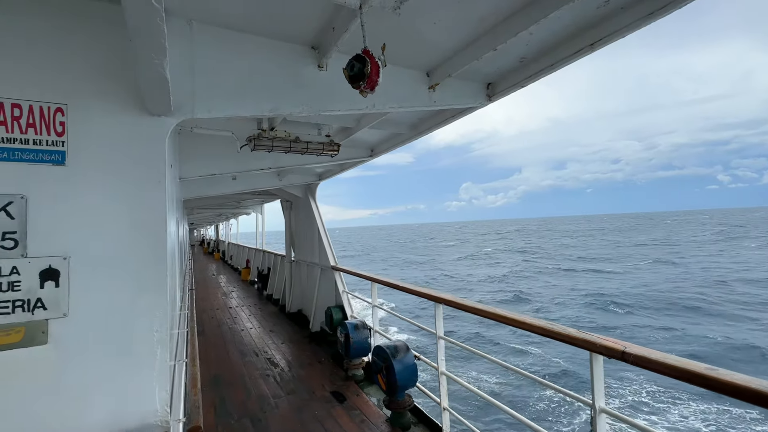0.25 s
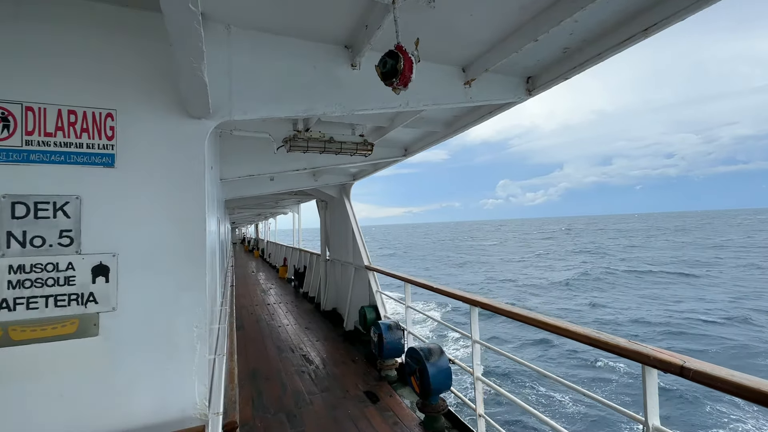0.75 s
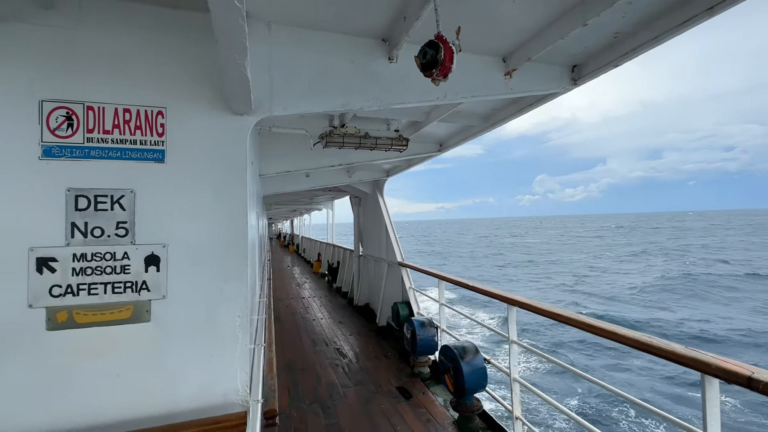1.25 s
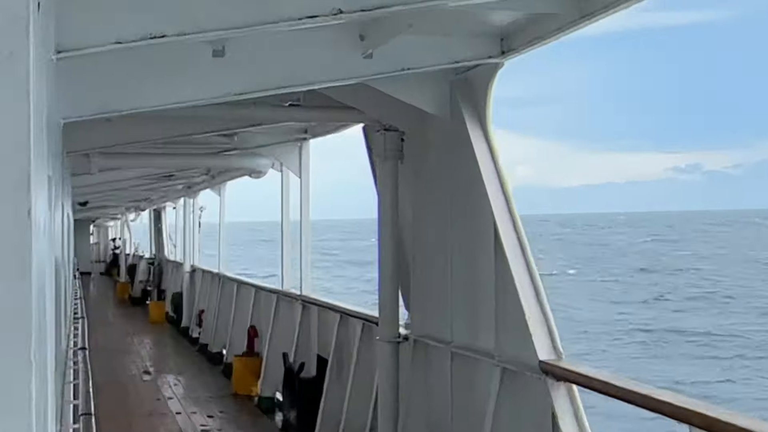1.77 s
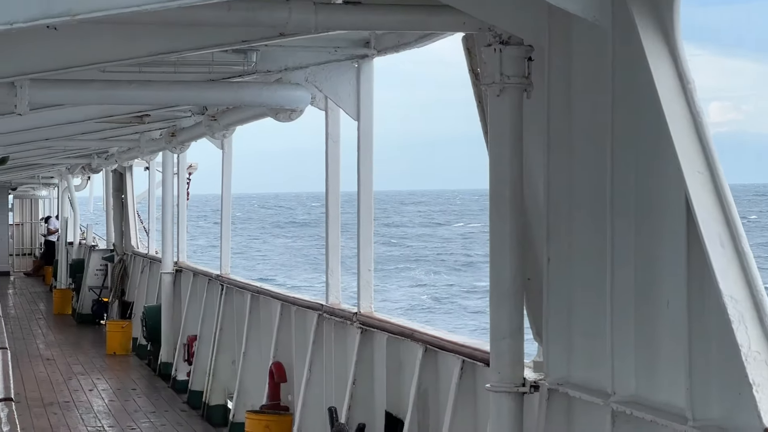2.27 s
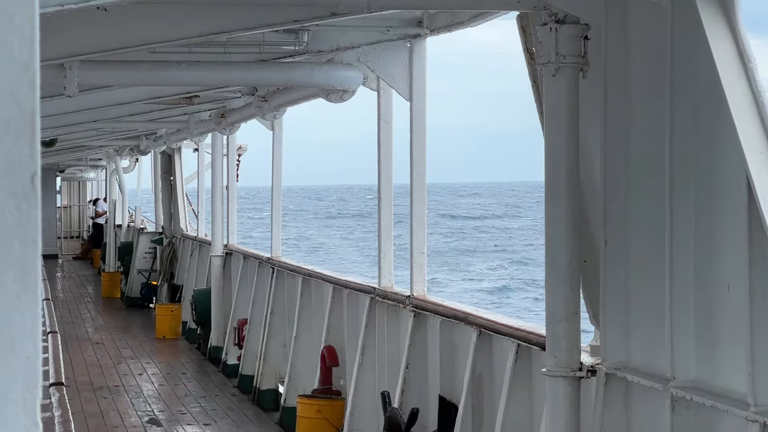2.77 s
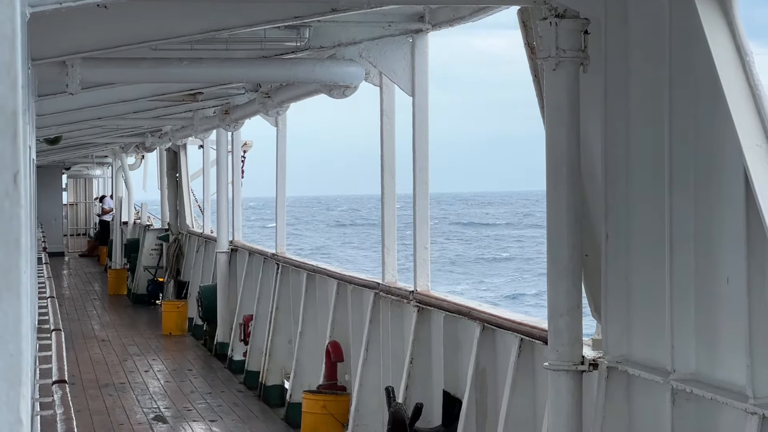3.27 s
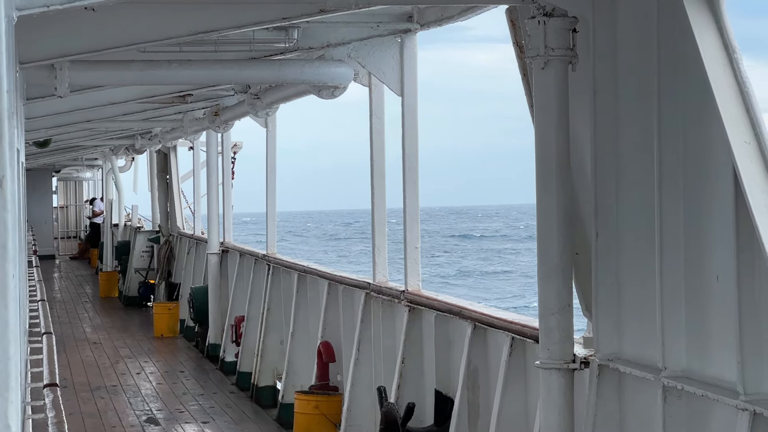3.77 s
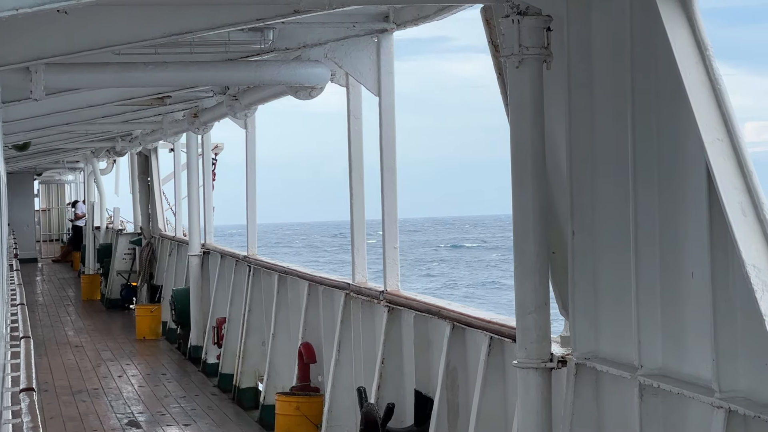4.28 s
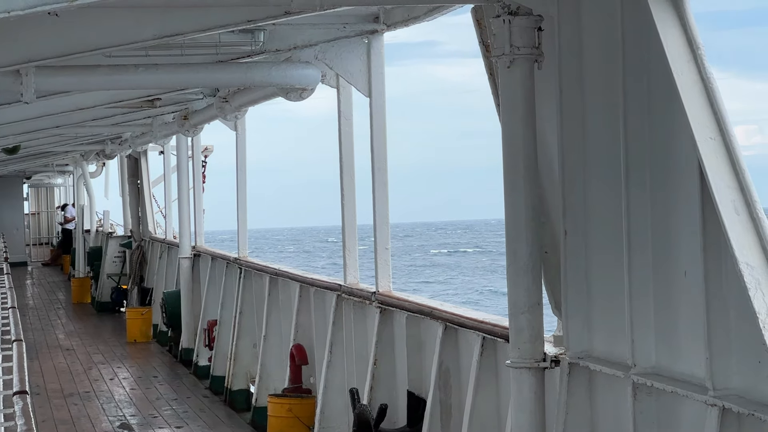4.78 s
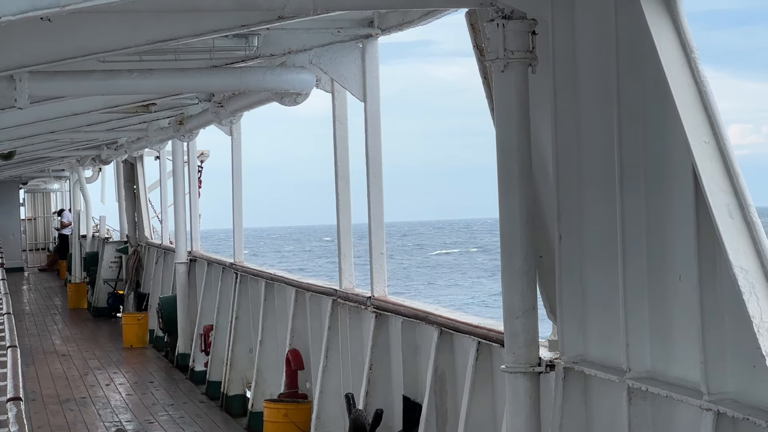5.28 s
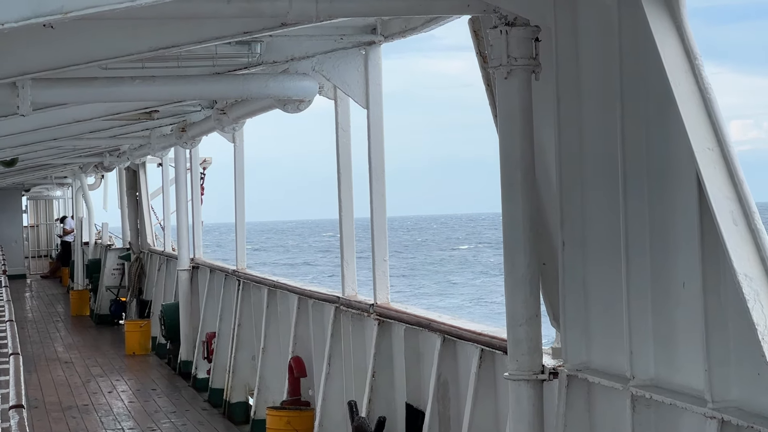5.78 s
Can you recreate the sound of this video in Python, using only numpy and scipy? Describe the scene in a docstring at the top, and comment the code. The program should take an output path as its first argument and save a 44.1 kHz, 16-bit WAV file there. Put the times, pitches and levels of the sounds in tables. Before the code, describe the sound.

Low pulsing engine drone and gusty rumble on an open ship deck, waves hissing along the side, one tiny dry tick past the middle.

```python
"""The open side deck of a ship under way, heard by a handheld phone close to the sea along the side.
From the start the firing tone of the engine, shaft orders and a slower machine come through the hull as tones,
with filtered noise for the unsteady drones, the wind-and-hull rumble, the wash and the spray. At 0.85 s a hollow
ring rises in the wash and sags in pitch. At 1.72 s the lens zooms in: the phone narrows its stereo beam, the wash
changes colour and the hum rises. Gusts lift the rumble most near 3.3 and 5.1 s; a dry tick falls at 3.73 s."""
import sys
import numpy as np
from scipy import signal
from scipy.fft import rfft, irfft, next_fast_len
from scipy.io import wavfile
from scipy.ndimage import uniform_filter1d

SR = 44100
rng = np.random.default_rng(int(sys.argv[2]) if len(sys.argv) > 2 else 0)


def store_wav(level_fs):
    """Save 16-bit WAV to argv[1]."""
    pcm = np.round(np.clip(np.atleast_2d(level_fs), -1, 1) * 32767)
    wavfile.write(sys.argv[1], SR, pcm.T.astype(np.int16))


N = 266187
SIZE = next_fast_len(N)
HZ = np.maximum(np.arange(SIZE // 2 + 1) * SR / SIZE, 1)
TIME = np.arange(N) / SR

# The phone: zoom and top of its range
ZOOM_S, ZOOM_SWITCH_S = 1.724, 0.0053
TOP_HZ = 15750

# A short dry tick: (time [s], level [dB])
TICKS = [(3.73084, -3)]

# Waves breaking along the side: (time [s], lift of the wash [dB])
WAVES = [(.1, 0), (.55, -0.5), (1.0, 1), (1.5, 0.5), (2.75, 1.3), (3.3, 1), (3.7, 2.5), (4.35, 2.5),
         (5.3, 2.5), (5.65, 1)]
WAVE_RISE_S, WAVE_FALL_S = 0.27, 0.55
SPRAY_SHARE, SPRAY_LATE_S = 0.81, 0.083  # the spray follows each wave a little later and less
CREST_HZ, CREST_SHARE = 1400, 1.04  # above this pitch the wash follows each wave more strongly
SURGE_PER_S = 4.54  # each half octave of the wash surges on its own

# Sea colour through the wide and the narrow beam: (frequency [Hz], relative density [dB per Hz])
WIDE_COLOUR = [(300, -51), (450, -52.5), (620, -55.5), (840, -52.5), (1000, -54.5), (1350, -55),
               (1700, -59), (2200, -63.5), (3000, -68.5), (4200, -71), (6300, -70.5), (8000, -71),
               (9500, -74), (10500, -78), (11500, -83), (12200, -92), (13000, -85.5), (15000, -90)]
NARROW_COLOUR = [(300, -55), (450, -58), (620, -60.5), (850, -60.5), (1200, -61.5), (1650, -60.5),
                 (1900, -62.5), (2050, -66), (2300, -71), (3200, -74), (5200, -73.5), (6400, -68.5),
                 (8800, -72), (10500, -74), (11400, -76), (12250, -83), (13000, -81.5), (15400, -84)]
# Stereo image of the sea through each beam:
# (frequency [Hz], likeness of the channels [0-1], lag of the right [rad], left minus right [dB])
WIDE_IMAGE = [(250, .8, 0, .5), (400, .6, .3, 1.5), (600, .4, 1.3, 2), (850, .2, .7, 3.4),
              (1200, .42, 1.2, 3), (1700, .2, 2.7, 1), (2400, .08, 2.5, .5), (4200, .1, 1, 2.5),
              (6300, .1, 0, 6.8), (8000, .1, 0, 3.5), (9400, .15, -1.2, -4), (10200, .4, -2.6, -1),
              (10450, 1, -3.14, 0), (12350, 1, -3.14, 0), (12700, .3, -5.3, 0), (13300, .6, -5.9, 0),
              (13700, 1, -6.28, 0)]
NARROW_IMAGE = [(250, .85, 0, 0), (600, .68, .3, 1.2), (850, .6, .6, 2), (1200, .4, 1.4, -1.5),
                (1600, .45, 3.1, -8), (2000, .55, 6.1, -3.5), (2500, .8, 6.6, -.5), (3200, .82, 6.85, 0),
                (4300, .95, 6.45, 0), (5300, .99, 6.3, 0), (6100, .9, 6.55, 0), (6900, .88, 7.2, 0),
                (7450, .99, 9.42, 0), (8300, .92, 12.4, 0), (9700, .78, 11.1, 0), (10700, 1, 9.42, 0),
                (12300, 1, 9.42, 0), (12500, .55, 7.6, 0), (13600, .7, 6.7, 0), (13800, 1, 6.28, 0)]

# A hollow ring in the wash, heard through the wide beam only
HOLLOW_HZ, HOLLOW_WIDTH_HZ, HOLLOW_DB = 858, 40, -36.5
HOLLOW_FROM_S, HOLLOW_RISE_S, HOLLOW_SAG_HZ_PER_S = 0.85, 0.06, 110

# Colour of the wind-and-hull rumble: (frequency [Hz], relative density [dB per Hz])
RUMBLE_COLOUR = [(15, -72), (24, -58), (31, -55), (36, -46), (45, -40), (56, -40), (64, -36), (85, -37.5),
                 (108, -42), (120, -43), (155, -45.5), (175, -49.5), (260, -54.5), (420, -65.5)]
# Rumble between 60 and 200 Hz, before the gusts: (time [s], level [dB])
RUMBLE_LEVEL = [(0, -20.5), (1.5, -19), (1.85, -25), (2.7, -21.5), (3.35, -18.5), (4.05, -20), (4.8, -18),
                (5.5, -21.5), (6.04, -21.5)]
RUMBLE_SIDE_DB = -14.5
# Strongest gust blows: (time [s], lift of the rumble [dB])
BUFFETS = [(2.45, 1), (3.0, 1.5), (3.3, 5), (3.51, 4.5), (3.8, 2.5), (4.45, -1), (4.05, 1), (4.77, 1.5),
           (5.08, 6), (5.28, 3.5), (5.87, 1)]
BUFFET_S = 0.059  # half length of a blow

# Blurred tones through the hull: (frequency [Hz], half width [Hz], level [dB])
DRONES = [(79.6, 0.8, -29), (224, 7, -42), (249, 3, -40), (332, 7, -39), (441, 7, -46), (538, 9, -47),
          (662, 8, -48), (830, 60, -48)]

# Machinery tones before the beam lift: (multiple of the turning rate [1], level [dB])
SHAFT_HZ, SLOW_HZ = 8.421, 3.441
SHAFT_ORDERS = [(7, -30), (8, -30), (10, -35), (12, -33), (13, -29), (15, -40), (17, -35), (18, -35),
                (19, -35), (21, -44), (23, -45)]
SLOW_ORDERS = [(6, -40), (10, -41), (11, -35), (12, -27), (13, -25), (16, -36), (19, -32), (23, -31),
               (24, -34), (25, -35), (28, -35), (38, -36)]
HUM_LIFT_DB = (-2.5, 1.5)  # through the wide and the narrow beam

# Firing tone of the main engine: (time [s], level [dB])
FIRING_LEVEL = [(0, -18.5), (.3, -18.5), (.6, -17), (.95, -21), (1.3, -16), (1.6, -19.5), (2.1, -13.5),
                (2.35, -19.5), (2.75, -14.5), (2.95, -11), (3.22, -19.5), (3.45, -18), (3.75, -10.5),
                (4.05, -19.5), (4.6, -13.5), (4.92, -21.5), (5.2, -15.5), (5.8, -12.5), (6.04, -15)]
CYLINDER_ORDER = 6  # firings per turn of the shaft
HULL_LAG_S = 0.00005  # the right port hears the hull a little late


def undb(db):
    """Decibels to gain."""
    return 10 ** (np.asarray(db) / 20)


def over_hz(table):
    """Columns of a table over frequency, joined on a log axis."""
    hz, *columns = np.transpose(table)
    return [np.interp(np.log(HZ), np.log(hz), column) for column in columns]


def over_time(table):
    """Columns of a table over time, joined by straight lines."""
    seconds, *columns = np.transpose(table)
    return [np.interp(TIME, seconds, column) for column in columns]


def to_sound(spectrum):
    """Spectrum back to sound, cut to length."""
    return irfft(spectrum, SIZE)[..., :N]


def band_rms(sound, edges):
    """RMS level of a signal between two frequencies."""
    in_band = (HZ > edges[0]) & (HZ < edges[1])
    power = np.abs(rfft(sound, SIZE)[in_band]) ** 2
    return np.sqrt(2 * power.sum() / SIZE / N)


def walk(rate):
    """Random levels held 1 / rate s and slewed twice; spread near 1."""
    hold = int(SR / rate)
    steps = np.repeat(rng.standard_normal(N // hold + 1), hold)
    slewed = uniform_filter1d(uniform_filter1d(steps, hold), hold)
    return 0.87 * slewed[:N]


def swells(table, rise_s, fall_s, late_s=0.):
    """Sum of bell-shaped lifts in dB, one for each row."""
    total_db = 0
    for peak_s, lift_db in table:
        since = TIME - peak_s - late_s
        length_s = np.where(since < 0, rise_s, fall_s)
        total_db = total_db + lift_db * np.exp(-(since / length_s) ** 2)
    return total_db


def churn(lo_hz, count, flicker_db, rate, surge_db=0.):
    """Spectrum of white noise whose half octaves each flicker and surge on their own."""
    white = rfft(rng.standard_normal(SIZE))
    place = np.clip(2 * np.log2(HZ / lo_hz), 0, count - 1)
    total = 0
    for k in range(count):
        half_octave = to_sound(white * np.clip(1 - np.abs(place - k), 0, 1))
        level_db = flicker_db * walk(rate) + surge_db * walk(SURGE_PER_S)
        total = total + half_octave * undb(level_db)
    return rfft(total, SIZE)


def narrow():
    """0 for the wide beam, 1 for the narrow one; the switch takes a few milliseconds."""
    return np.clip((TIME - ZOOM_S) / ZOOM_SWITCH_S + 0.5, 0, 1)


def tick():
    """A 7 kHz swing under a bell of a fraction of a millisecond, alike in both channels."""
    out = np.zeros(N)
    for peak_s, db in TICKS:
        since = TIME - peak_s
        bell = np.exp(-(since / 0.00005) ** 2)
        out -= undb(db) * bell * np.cos(2 * np.pi * 7000 * since + 0.15)
    return out


def hollow(multiple=1, lift_db=0):
    """A narrow band of noise that rises in the wash and sags in pitch, stronger on the left."""
    since = TIME - HOLLOW_FROM_S
    turn = 2 * np.pi * multiple * (HOLLOW_HZ - HOLLOW_SAG_HZ_PER_S * since / 2) * since
    lowpass = 1 / (1 + (HZ / HOLLOW_WIDTH_HZ / multiple) ** 2)
    slow = to_sound(rfft(rng.standard_normal((2, 2, SIZE))) * lowpass)
    ring = slow[0] * np.cos(turn) + slow[1] * np.sin(turn)
    rise = 1 / (1 + np.exp(-since / HOLLOW_RISE_S))
    return undb(HOLLOW_DB + lift_db) * rise * ring / ring.std() * undb([[2.5], [-2.5]])


def sea(calm_wash_db, calm_spray_db, surge_db, colour, image):
    """Noise of wash and spray through one beam: the right port hears a late share of the left."""
    likeness, lag, pan_db = over_hz(image)
    shared, own = (churn(300, count=11, flicker_db=1.1, rate=12, surge_db=surge_db) for _ in range(2))
    right = likeness * np.exp(-1j * lag) * shared + np.sqrt(1 - likeness ** 2) * own
    both = np.array([undb(pan_db / 2) * shared, undb(-pan_db / 2) * right])
    both = both * undb(over_hz(colour)[0]) / (1 + (220 / HZ) ** 4)  # the bass is left to the rumble

    # Split by pitch: body lowest, crest between, spray on top
    spray_share = 1 / (1 + (2500 / HZ) ** 6)
    body_share = 1 / (1 + (HZ / CREST_HZ) ** 6)
    body = to_sound(both * body_share)
    crest = to_sound(both * (1 - body_share - spray_share))
    spray = to_sound(both * spray_share)

    wave_db = swells(WAVES, WAVE_RISE_S, WAVE_FALL_S)
    late_wave_db = swells(WAVES, WAVE_RISE_S, WAVE_FALL_S, SPRAY_LATE_S)
    spray_db = calm_spray_db + SPRAY_SHARE * late_wave_db
    wash = undb(wave_db) * body + undb(CREST_SHARE * wave_db) * crest
    wash = wash / band_rms((body + crest).mean(axis=0), edges=(500, 2000))  # scaled by the calm sea
    spray = spray / band_rms(spray.mean(axis=0), edges=(3000, 9000))
    return undb(calm_wash_db) * wash + undb(spray_db) * spray


def rumble():
    """Flickering low noise of wind and hull; the two ports differ more as the pitch rises."""
    colour = undb(over_hz(RUMBLE_COLOUR)[0]) * (HZ < RUMBLE_COLOUR[-1][0])
    mid, side = (to_sound(colour * tilt * churn(40, count=7, flicker_db=2, rate=9))
                 for tilt in (1, (HZ / 100) ** 0.7))
    level_db = over_time(RUMBLE_LEVEL)[0] + swells(BUFFETS, BUFFET_S, BUFFET_S)
    gain = undb(level_db) / band_rms(mid, edges=(60, 200))
    return gain * (mid + undb(RUMBLE_SIDE_DB) * side * np.array([[1], [-1]]))


def drones():
    """Noise in narrow resonances: tones too unsteady to be lines."""
    out = 0
    for hz, width, db in DRONES:
        resonance = 1 / (1 + ((HZ - hz) / width) ** 2)
        ring = to_sound(rfft(rng.standard_normal(SIZE)) * resonance)
        out = out + undb(db) * ring / ring.std()
    return out


def hum(rate_hz, orders, waver_db):
    """Tones on multiples of a turning rate, each wavering slowly as the hull carries it."""
    out = 0
    for multiple, db in orders:
        turn = 2 * np.pi * (multiple * rate_hz * TIME + rng.random())
        out = out + np.sqrt(2) * undb(db + waver_db * walk(3.41)) * np.sin(turn)
    return out


def firing():
    """The tone at which the cylinders fire, a sine swelling and sinking slowly."""
    turn = 2 * np.pi * (CYLINDER_ORDER * SHAFT_HZ * TIME + rng.random())
    return np.sqrt(2) * undb(over_time(FIRING_LEVEL)[0]) * np.sin(turn)


def machines():
    """All that the machinery sends through the hull, a little late at the right port."""
    orders = hum(SHAFT_HZ, SHAFT_ORDERS, waver_db=1.3) + hum(SLOW_HZ, SLOW_ORDERS, waver_db=1.3)
    beam_lift = undb(np.interp(narrow(), (0, 1), HUM_LIFT_DB))
    hull = firing() + beam_lift * orders + drones()
    return np.array([hull, np.interp(TIME - HULL_LAG_S, TIME, hull)])


def scene():
    """Sea through the wide beam, then the narrow one, with rumble, machinery and tick."""
    wide = sea(-29.5, -34, surge_db=1.5, colour=WIDE_COLOUR, image=WIDE_IMAGE)
    wide = wide + hollow() + hollow(multiple=1.42, lift_db=-3)  # a lower and a higher ring
    tight = sea(-32, -36, surge_db=1.37, colour=NARROW_COLOUR, image=NARROW_IMAGE)
    beams = np.sqrt(1 - narrow()) * wide + np.sqrt(narrow()) * tight
    return tick() + beams + rumble() + machines()


def record(dry):
    """The phone rounds the loudest peaks and cuts the top."""
    rounded = np.tanh(0.5 * dry) / 0.5
    top_cut = signal.ellip(14, 0.5, 80, TOP_HZ, fs=SR, output="sos")
    return signal.sosfilt(top_cut, rounded)


dry = scene()
out = record(dry)
store_wav(out)
```